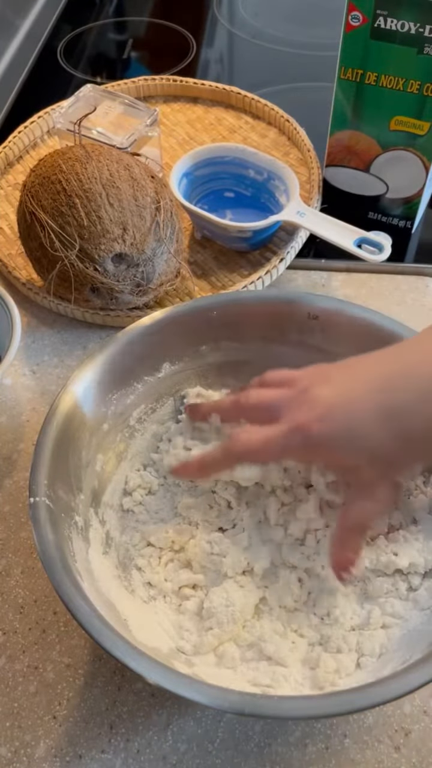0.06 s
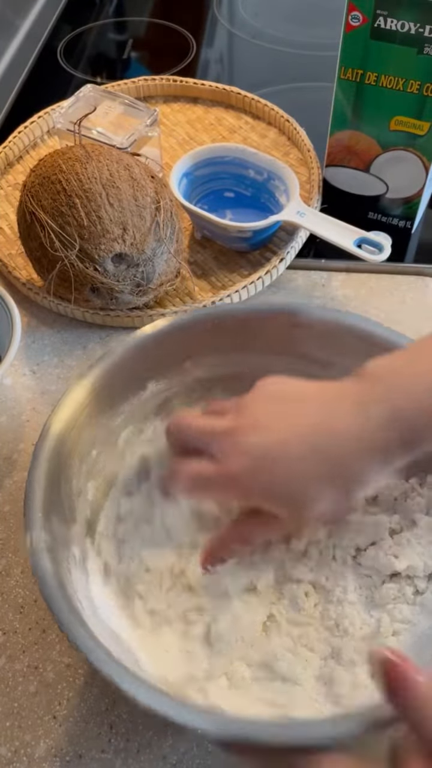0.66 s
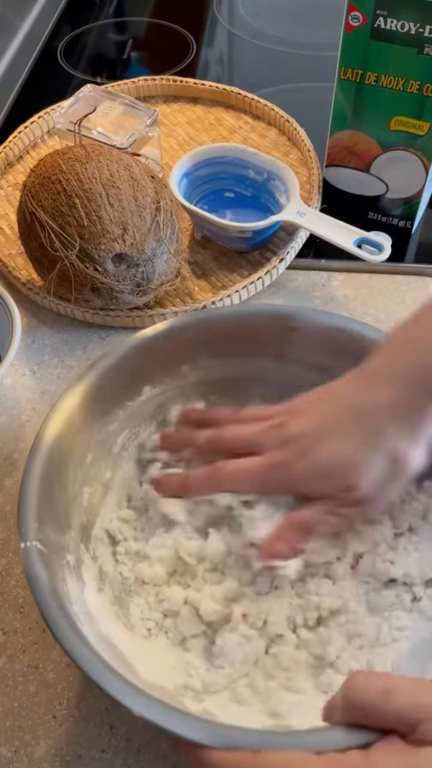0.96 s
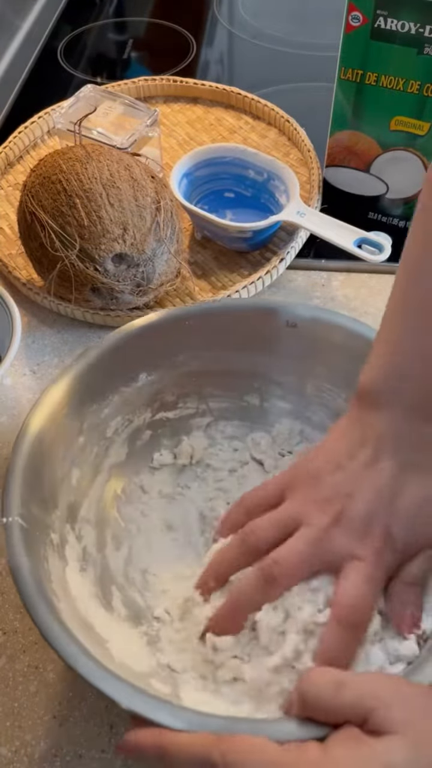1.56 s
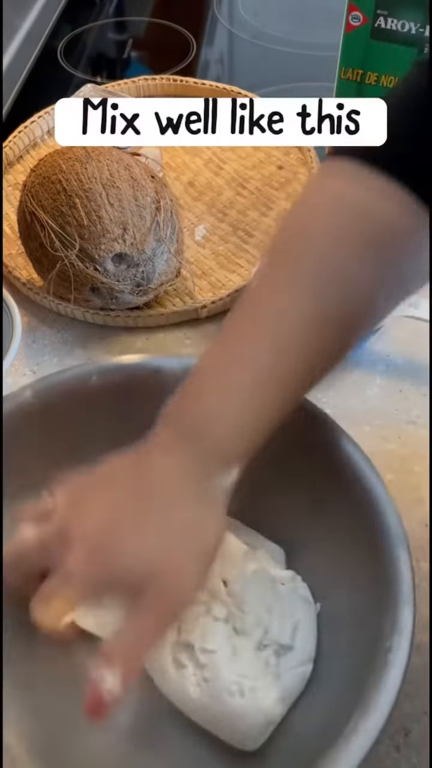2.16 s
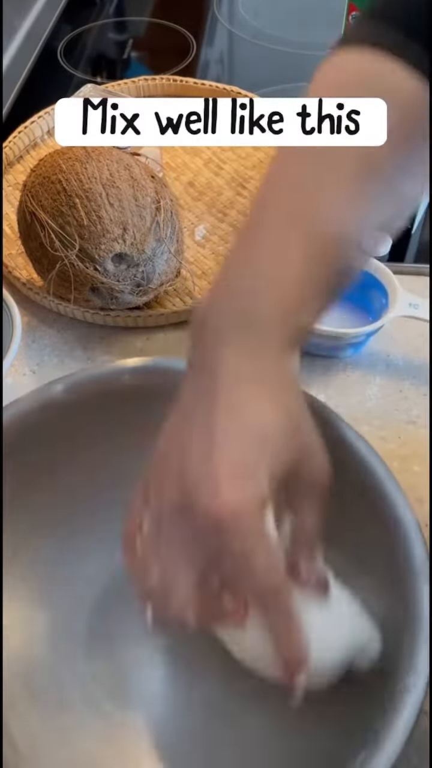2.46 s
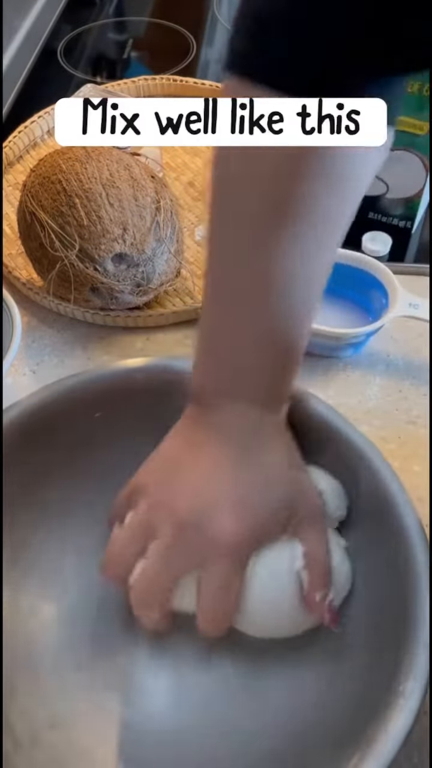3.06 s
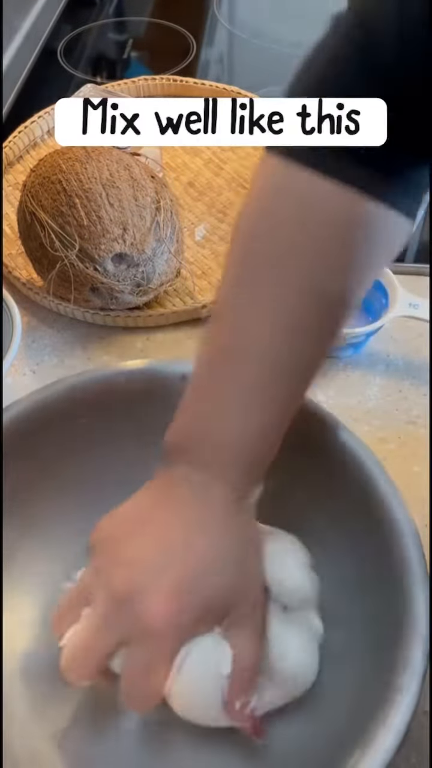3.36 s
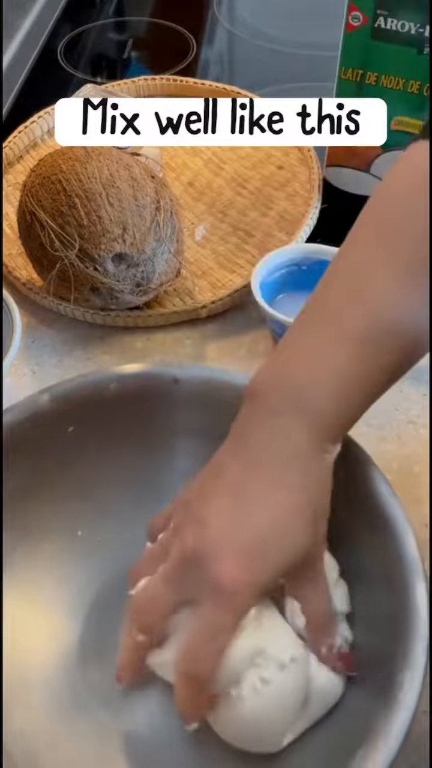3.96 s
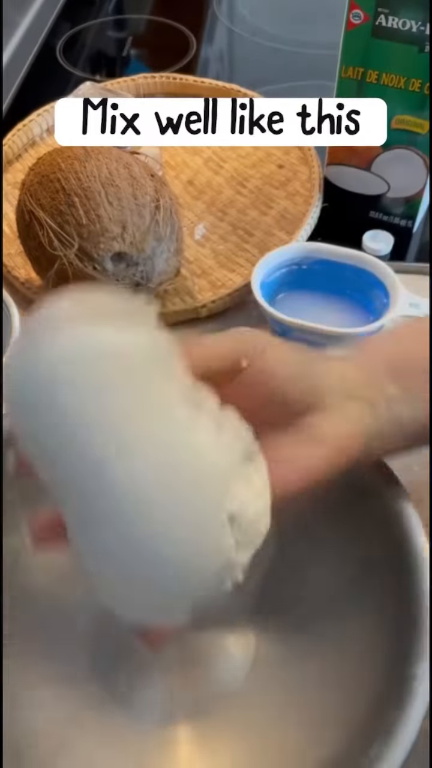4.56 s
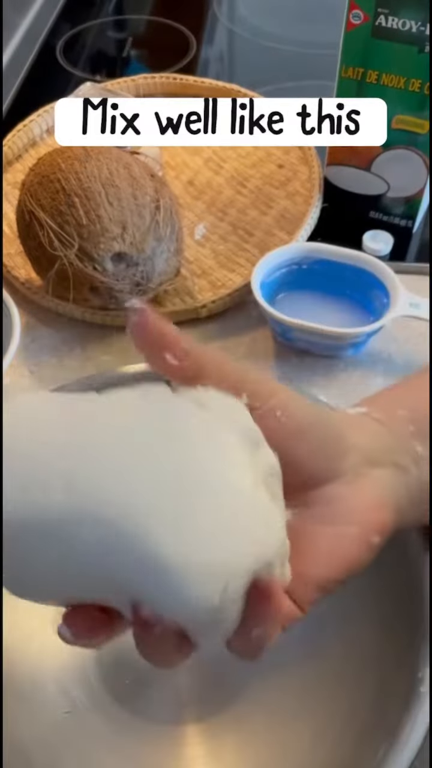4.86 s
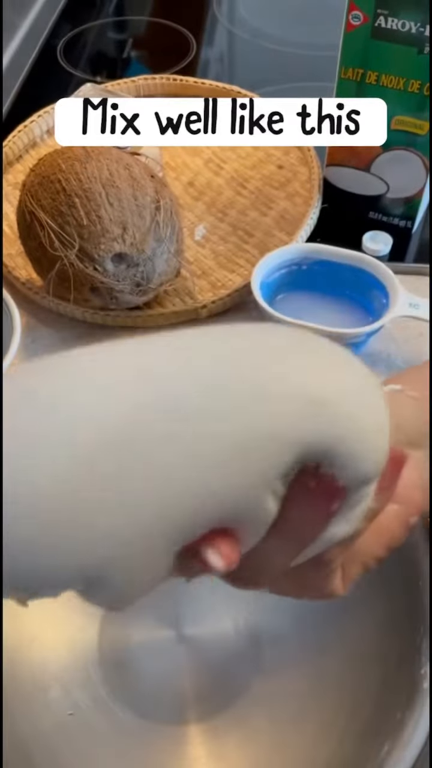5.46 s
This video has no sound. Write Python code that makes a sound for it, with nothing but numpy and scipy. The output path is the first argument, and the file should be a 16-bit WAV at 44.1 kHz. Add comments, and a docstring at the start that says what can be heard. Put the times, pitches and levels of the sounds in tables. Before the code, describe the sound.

A hand works flour and dough in a steel bowl, heard close up in a small kitchen with a faint echo and low room tone. For the first two seconds, uneven strokes rustle and scrape through crumbs, with soft pats that thud into the counter, the strongest at about 0.6 and 0.8 seconds. Fingers lightly brush the rim, and a sharper tap comes at 1.9 seconds. From there sticky dough drags and faintly squelches, with dull slaps over a low rumble from the bowl. Harder pushes knock the bowl on the counter: a thud with a short clank at 3.2 seconds, a lighter knock at 3.6, the loudest ringing clank just before 4, and more knocks from 4.1 to 4.6, with a strong one at 4.5. After that, faint skin and rim rubbing fades toward room tone by about 5.5 seconds.

```python
"""A steel bowl knocks on a kitchen counter as a hand mixes flour, then kneads sticky dough in it.
Each push rings the bowl's modes; the counter thuds just after. Pats slap and squeeze out trapped air.
Crumbs and skin rustle on the steel, dough drags and squelches, fingers brush the rim.
A small kitchen echoes faintly over its room tone. Heard close up, through a phone."""
import sys
import numpy as np
from scipy import signal
from scipy.fft import rfft, irfft
from scipy.io import wavfile
from scipy.ndimage import uniform_filter1d

SR = 44100
rng = np.random.default_rng(int(sys.argv[2]) if len(sys.argv) > 2 else 0)


def to_wav(sig):
    """Store sig (one row per channel, or 1-D mono) as 16-bit WAV at the path in sys.argv[1].

    Samples outside -1..1 are clipped; the rate is SR.
    """
    pcm = np.clip(np.atleast_2d(sig), -1, 1) * 32767
    pcm = np.round(pcm).astype(np.int16)
    wavfile.write(sys.argv[1], SR, pcm.T)  # frames by channels


N = 251370
TIME_S = np.arange(N) / SR
EVENT_S = TIME_S[:int(.9 * SR)]

# Spectra: f/Hz, level/dB
ROOM_SPECTRUM = [(12, -19), (20, -.5), (54, -5), (107, -5.5), (609, -32), (751, -35.5), (3270, -54),
                 (8200, -47), (10700, -64.5), (13900, -93), (22000, -120)]
ECHO_SPECTRUM = [(60, 0), (300, 9), (700, -2.5), (2000, -6), (6000, 0), (10000, -7)]
RUMBLE_SPECTRUM = [(20, -39), (32, -24.5), (45, -5.5), (64, 7.5), (90, -1), (118, 5.5), (150, -8.5),
                   (220, -14.5), (300, -11.5), (450, -21.5), (900, -54)]
RUSTLE_SPECTRUM = [(1500, -34.5), (2400, -16.5), (3500, -4.5), (4600, -8.5), (5400, -1), (6800, 1.5),
                   (8000, -8), (9200, 1), (10200, -29)]
DRAG_SPECTRUM = [(150, -1), (320, 0), (550, 4), (850, 0.5), (1120, 4.5), (1600, -2), (2200, -1.5),
                 (3300, -6), (4400, -3.5), (8000, -38.5)]
SLAP_SPECTRUM = [(120, -11), (335, 11), (520, -0.5), (750, 0), (1150, 2), (1700, -5.5), (2700, -3.5),
                 (3500, -5.5), (4400, -26.5), (8000, -39.5)]
CRACK_SPECTRUM = [(1800, -49.5), (2800, -13), (3600, -9), (4300, 6), (5200, 3), (6600, 7.5), (7600, 0.5),
                  (8600, -2), (10200, -23)]
# Counter under the bowl: f/Hz, t60/s, level/dB
COUNTER_MODES = [(71, 0.26, 3), (113, 0.25, 1.5), (180.4, 0.23, 1), (230, 0.13, -5.5), (289.9, 0.38, -14),
                 (362, 0.021, -14), (394, 0.11, -14.5), (470, 0.04, -20)]
# Steel bowl: f/Hz, t60/s, level/dB touched at bottom, at wall, at rim, left minus right/dB
BOWL_MODES = [(754, .075, 5, -12, -35, -5), (1075, .15, -15, -2, -14, -1), (1215, .07, -5, -10, -30, -1),
              (1281, .085, -3, -13, -35, -1), (1338, .07, -4, -11, -35, -1), (1470, .06, -1, -5, -35, 0),
              (1966, .1, -11, -12, -28, -2), (2600, .11, -19, -16, -16, 0), (1723, .45, -36, -25, -32, 0),
              (2096, .06, -13, -15, -18, -1), (2432, .5, -36, -21, -5, 0), (3660, .35, -38, -27, -1, 0),
              (910, .06, -19, -26, -35, -2), (1105, .45, -29, -24, -35, -1), (1610, .12, -25, -22, -35, 0),
              (1845, .15, -26, -23, -30, 0), (2229, .4, -30, -28, 3, 0), (2280, .12, -23, -21, -6, 0),
              (2790, .07, -24, -19, -16, 0), (2988, .25, -36, -25, -5, 0), (3133, .1, -29, -21, -14, 0),
              (3440, .2, -38, -28, -20, 0), (4253, .4, -52, -40, -2, 0), (5100, .1, -24, -24, -8, 0),
              (5335, .22, -28, -27, 1, 0), (5889, .25, -34, -30, -2, 0), (6358, .25, -34, -30, -5, 0)]
# Fingers on the rim: t/s, rise/s, 20 dB fall/s, level/dB, cutoff/Hz
RIM_BRUSHES = [(0.579, .07, 0.53, -55.5, 9500), (1.66, 0.25, 0.12, -53, 9200),
               (4.51, 0.093, 0.05, -52.5, 2000), (4.95, 0.14, .38, -64.5, 3527)]
# Hand round the bowl: t/s, rise/s, 20 dB fall/s, rustle/dB, drag/dB, scrape/Hz, crumbly share (0..1)
HAND_STROKES = [(0, .01, 0.16, -75, -62.5, 490, 0.44), (0.344, 0.012, 0.46, -54.5, -55, 926, 0.021),
                (0.402, 0.026, -0.05, -44.5, -67, 1070, 0.016), (0.459, .09, 0.58, -50, -56, 2050, 0.67),
                (0.79, 0.075, 0.32, -52.5, -56, 900, 0.14), (0.95, .08, 0.4, -49.5, -53.5, 1400, 0.56),
                (1.218, .045, 0.4, -90, -60.5, 730, 0.3), (1.29, .06, 0.67, -54, -59.5, 900, 0.7),
                (1.41, .08, 1.3, -59.5, -62, 2700, 0.14), (1.905, .015, 0.1436, -41.5, -44.5, 2090, 0.4),
                (2.03, .08, 0.43, -58.5, -56.5, 880, 0.57), (2.556, 0.044, 0.07, -43, -52.5, 1420, 0.066),
                (2.618, .02, 0.17, -54.5, -53, 1330, 0.22), (2.701, .15, 0.45, -46, -59, 2040, 0.24),
                (2.97, 0.244, -0.14, -53.5, -49.5, 1310, 0.56), (3.236, .01, 0.23, -65.5, -52, 1100, 0.93),
                (3.451, .1, 1.24, -62.5, -62, 1400, 0.6), (3.657, 0.025, 0.0655, -51, -46, 1600, .5),
                (3.85, .11, 0.17, -48.5, -49.5, 2000, 0.94), (4.02, .04, 0.48, -58, -42, 1492, 0.3),
                (4.14, .04, 0.36, -50.5, -56, 1300, .5), (4.382, .04, 0.134, -55, -47.5, 1200, 0.72),
                (4.529, .04, 0.0465, -48.5, -39, 1470, 0.96), (4.951, .11, 0.33, -62.5, -93.5, 2317, .3),
                (5.28, .17, 0.4, -77, -80, 2008, 0.58)]
# Soft pats: t/s, slap/dB, thud/dB, thud centre/Hz, place (0 bottom, 1 wall, 2 rim)
DOUGH_PATS = [(0.409, -56.5, -33.5, 96, 0), (0.533, -61, -39.5, 101, 1.2), (0.603, -38.5, -22.5, 114, 0.45),
              (0.622, -42.5, -46, 110, 0.54), (0.831, -41, -31.5, 116, 0),
              (1.367, -50.5, -51.5, 139, 0.081), (1.695, -54.5, -44, 92, 0.24),
              (1.883, -37.5, -36, 79, 1.9), (2.305, -44, -35.5, 101.6, 0.35),
              (2.598, -54.5, -43.5, 82, 0.39), (2.984, -54, -59, 170, 1.8), (3.1, -47, -66, 170, 0.28),
              (3.194, -46, -42.5, 85, 0.66), (3.513, -58.5, -48.5, 99, 0.89), (3.813, -48.5, -38, 100, .1)]
# Hard knocks: t/s, clank/dB, crack/dB, thud/dB, thud centre/Hz, place, ring time factor
STEEL_KNOCKS = [(0.718, -51.5, -38.5, -50, 99, 1.23, 0.23), (1.885, -57, -28, -44, 260, 1.67, 1),
                (3.222, -28.5, -36.5, -24, 120, 0.53, 0.17), (3.238, -35.5, -50, -56, 180, 0.53, 0.14),
                (3.640, -35.5, -38, -45.5, 108, 0.46, .12), (3.702, -53, -46, -61.5, 120.4, 1, .25),
                (3.951, -12, -26.5, -21.5, 199, 0.13, 0.89), (4.019, -36, -73, -39, 200, 0.83, 0.21),
                (4.081, -37, -46.5, -30.5, 169, 0.61, 0.9), (4.371, -36.5, -50, -25, 46, 0.95, 0.73),
                (4.487, -22, -33.5, -20, 115, 0.87, 0.82), (4.564, -34.5, -44.5, -29.5, 173, 0.63, 0.35)]


def undb(db):
    return 10 ** (np.asarray(db) / 20)


def unit(x):
    return x / np.sqrt(np.mean(x ** 2))


def burst(x):
    """Rms 1 over the first 30 ms."""
    return x / np.sqrt(np.mean(x[..., :int(.03 * SR)] ** 2))


def noise(size):
    return rng.standard_normal((2, size))


def wobble(rate_hz):
    """Smooth random drift, rms 1."""
    hold = int(SR / rate_hz)
    steps = np.repeat(rng.standard_normal(N // hold + 1), hold)
    return unit(uniform_filter1d(steps, hold)[:N])


def grains(per_s, scatter_db):
    """Tiny clicks, a few much larger than the rest."""
    clicks = noise(N) * (rng.random(N) < per_s / SR)
    return clicks * undb(scatter_db * np.minimum(rng.exponential(size=N), 4))


def colour(x, spectrum):
    """Filter by a spectrum table; rms 1."""
    hz, db = np.transpose(spectrum)
    f = np.maximum(np.fft.rfftfreq(x.shape[-1], 1 / SR), 1)
    gain = undb(np.interp(np.log(f), np.log(hz), db))
    return unit(irfft(rfft(x) * gain, x.shape[-1]))


def band(x, hz, octaves):
    """Steep band-pass; rms 1."""
    f = np.maximum(np.fft.rfftfreq(x.shape[-1], 1 / SR), 1)
    return unit(irfft(rfft(x) / (1 + (np.log2(f / hz) / octaves) ** 4), x.shape[-1]))


def butter(x, hz, kind):
    return signal.sosfilt(signal.butter(2, min(hz, SR / 3), kind, fs=SR, output="sos"), x)


def spread(pair, side_db, pan_db=0):
    """Mid, side -> left, right."""
    mid, side = pair[0], pair[1] * undb(side_db)
    return np.array([(mid + side) * undb(pan_db / 2), (mid - side) * undb(-pan_db / 2)])


def add(out, sound, at_s):
    start = int(at_s * SR)
    part = sound[:, :N - start]
    out[:, start:start + part.shape[1]] += part


def fade(t60_s, rise_s):
    """Blow envelope: quick rise, exponential decay."""
    return (1 - np.exp(-EVENT_S / rise_s)) * undb(-60 * EVENT_S / max(t60_s, .005))


def gesture(t, rise_s, fall_s):
    """Hand speed: builds smoothly, then comes to rest."""
    build = np.sin(np.pi / 2 * np.clip(t / rise_s, 0, 1))
    return build * undb(-20 * np.maximum(t - rise_s, 0) / max(fall_s, .01))


def room_tone(level_db=-63.5):
    """Still kitchen air, mostly bass."""
    return undb(level_db) * spread(colour(noise(N), ROOM_SPECTRUM), side_db=-14.5)


def kitchen_echo(x, t60_s=.36, wet_db=-19):
    """Diffuse echo off cupboards and tiles."""
    tail = colour(noise(len(EVENT_S)), ECHO_SPECTRUM) * fade(t60_s, rise_s=.011)
    tail[1] = butter(tail[1], 500, "high")  # long waves reach both microphones alike
    tail = spread(tail, side_db=-5) / np.linalg.norm(tail[0])
    return undb(wet_db) * signal.fftconvolve(x, tail, axes=1)[:, :N]


def hollow(x, t60_s=.05, echo_db=-2):
    """Bounces inside the bowl leave narrow peaks and dips."""
    bounces = rng.standard_normal(len(EVENT_S)) * fade(t60_s, rise_s=.003)
    echo = signal.fftconvolve(x, bounces[None] / np.linalg.norm(bounces), axes=1)
    return unit(x + undb(echo_db) * echo[:, :x.shape[1]])


def wall_notch(x, hz=4330, width_hz=420):
    """An echo off the bowl's wall cancels one band."""
    b, a = signal.iirnotch(hz, hz / width_hz, fs=SR)
    return signal.lfilter(b, a, signal.lfilter(b, a, x))


def rim_brush(damping=1.15):
    """Sliding fingers excite and damp the rim's high modes."""
    f = np.fft.rfftfreq(N, 1 / SR)
    response = sum(undb(rim_db) / (1 + 2j * np.pi * (f - hz) * t60_s / damping / np.log(1000))
                   for hz, t60_s, _, _, rim_db, _ in BOWL_MODES)
    shimmer = spread(unit(irfft(rfft(noise(N)) * response, N)), side_db=-4)
    return sum(undb(db) * unit(butter(shimmer, cutoff_hz, "low")) * gesture(TIME_S - at_s, rise_s, fall_s)
               for at_s, rise_s, fall_s, db, cutoff_hz in RIM_BRUSHES)


def squelch(pockets_hz=(657, 1120, 1610, 2550)):
    """Air pockets pop in the dough."""
    pops = sum(band(grains(per_s=140, scatter_db=6.5), hz, octaves=.27) for hz in pockets_hz)
    return spread(hollow(pops), side_db=-16)


def bowl_rumble(drag_level, rest_db=-57.5, over_drag_db=2.5, lifted_s=4.78, fall_s=.5):
    """Rumble under the hand; follows the drag, dies once the dough is lifted."""
    resting = undb(rest_db - 20 * np.maximum(TIME_S - lifted_s, 0) / fall_s)
    rumble = spread(colour(noise(N), RUMBLE_SPECTRUM), side_db=-33.5)
    return rumble * np.hypot(resting, undb(over_drag_db) * drag_level)


def rubbing(drag_gain_db=1.5, squelch_gain_db=-12.5):
    """Crumbly share of the strokes: crumbs rustle, sticky dough drags in small slips."""
    rustle_level = drag_level = 0
    for at_s, rise_s, fall_s, rustle_db, drag_db, _, crumbly in HAND_STROKES:
        effort = np.sqrt(crumbly) * gesture(TIME_S - at_s, rise_s, fall_s)
        rustle_level = np.hypot(rustle_level, undb(rustle_db) * effort)
        drag_level = np.hypot(drag_level, undb(drag_db) * effort)
    slips = wobble(rate_hz=49)
    rustle = spread(colour(hollow(grains(per_s=3000, scatter_db=.5)), RUSTLE_SPECTRUM), side_db=-5.5)
    drag = spread(colour(hollow(grains(per_s=3000, scatter_db=2.5)), DRAG_SPECTRUM), side_db=-7.5)
    crumbs = rustle * undb(2 * slips)
    dough = wall_notch(drag) * undb(drag_gain_db + 1.3 * slips) + undb(squelch_gain_db) * squelch()
    return rustle_level * crumbs + drag_level * dough + bowl_rumble(drag_level)


def swipes(hiss_hz=7280, hiss_gain_db=-2.5, scrape_gain_db=-2):
    """Smooth share of the strokes: skin hisses, dough scrapes; the hand alters the echo each time."""
    out = np.zeros((2, N))
    for at_s, rise_s, fall_s, rustle_db, drag_db, scrape_hz, crumbly in HAND_STROKES:
        friction = hollow(noise(len(EVENT_S)), t60_s=.079, echo_db=-1.5)
        hiss = spread(band(friction, hiss_hz, octaves=.3), side_db=-4.5)
        scrape = spread(band(friction, scrape_hz, octaves=.55), side_db=-20.5)
        slide = undb(rustle_db + hiss_gain_db) * hiss + undb(drag_db + scrape_gain_db) * scrape
        add(out, slide * np.sqrt(1 - crumbly) * gesture(EVENT_S, rise_s, fall_s), at_s)
    return out


def counter_thud(centre_hz, at_s, dough_from_s=1.8, octaves=1.07):
    """Slow counter modes round centre_hz; heavy dough damps them more than loose flour."""
    ring = .92 if at_s < dough_from_s else .36
    out = 0
    for k, (hz, t60_s, db) in enumerate(COUNTER_MODES):
        weight = (-1) ** k * undb(db) / (1 + (np.log2(hz / centre_hz) / octaves) ** 4)
        out += weight * np.sin(2 * np.pi * hz * EVENT_S) * fade(t60_s * ring, rise_s=.005)
    return burst(out) * np.ones((2, 1))


def air_pock():
    """Air escapes between dough and steel: a short hollow note."""
    air = spread(band(noise(len(EVENT_S)), hz=790, octaves=.66), side_db=-12)
    return burst(air * fade(t60_s=.034, rise_s=.001))


def bowl_clank(place, ring, bend_depth=.002, bend_hz=12, build_cycles=5, contact_s=.00058):
    """Place weights the steel's modes; dough cushions the onset, shortens the ring, bends the pitch."""
    out = np.zeros((2, len(EVENT_S)))
    for hz, t60_s, bottom_db, wall_db, rim_db, pan_db in BOWL_MODES:
        t = EVENT_S[:int(1.3 * t60_s * max(ring, .2) * SR)]
        phase, bend_phase = rng.uniform(0, 2 * np.pi, 2)
        bend = bend_depth * hz / bend_hz * np.sin(2 * np.pi * bend_hz * t + bend_phase)
        # short waves reach the two microphones further out of step
        skew = .3 * np.sqrt(hz / 3000) * rng.standard_normal((2, 1))
        place_db = np.interp(place, [0, 1, 2], [bottom_db, wall_db, rim_db])
        gain = undb(place_db + np.array([[pan_db], [-pan_db]]) / 2)
        envelope = (1 - np.exp(-t * hz / build_cycles)) * undb(-60 * t / (t60_s * ring))
        out[:, :len(t)] += gain * envelope * np.sin(2 * np.pi * hz * t + phase + bend + skew)
    return burst(out * (1 - np.exp(-EVENT_S / contact_s)))


def blow(slap_db, crack_db, clank_db, place, ring):
    """One contact: dull dough slap, bright crack, nail snap, ringing steel."""
    size = len(EVENT_S) // 3
    slap = spread(colour(noise(size), SLAP_SPECTRUM), side_db=-14.5, pan_db=-1.5)
    slap *= fade(t60_s=.073, rise_s=.0026)[:size]
    slap = butter(slap, 1200 * 2 ** (2.4 * place), "low")  # duller on the cushioned bottom
    crack = spread(colour(hollow(noise(size)), CRACK_SPECTRUM), side_db=-3)
    crack *= fade(t60_s=.019 + .09 * ring, rise_s=.002)[:size]
    snap = spread(band(noise(size), hz=8496, octaves=.12), side_db=-15)
    snap *= fade(t60_s=.015, rise_s=.0028)[:size]
    snap_db = crack_db - 12 + 12.5 * (place - 1)  # louder towards the bare rim
    out = undb(clank_db) * bowl_clank(place, ring)
    for db, part in (slap_db, slap), (crack_db, crack), (snap_db, snap):
        out[:, :size] += undb(db) * burst(part)
    return out


def knocks_and_pats(thud_lag_s=.004):
    """Knocks are mostly steel, pats mostly dough and air; the counter answers each."""
    out = np.zeros((2, N))
    for at_s, clank_db, crack_db, thud_db, thud_hz, place, ring in STEEL_KNOCKS:
        add(out, blow(clank_db - 9.5, crack_db, clank_db, place, ring), at_s)
        add(out, undb(thud_db) * counter_thud(thud_hz, at_s), at_s + thud_lag_s)
    for at_s, slap_db, thud_db, thud_hz, place in DOUGH_PATS:
        add(out, blow(slap_db, slap_db - 15, slap_db - 17, place, ring=.45), at_s)
        add(out, undb(slap_db - 5) * air_pock(), at_s)
        add(out, undb(thud_db) * counter_thud(thud_hz, at_s), at_s + thud_lag_s)
    return out


def scene():
    """Bowl, echo, room tone."""
    bowl = wall_notch(knocks_and_pats() + swipes()) + rubbing() + rim_brush()
    return bowl + kitchen_echo(bowl) + room_tone()


def record(dry, low_hz=40, top_hz=10400, ceiling=.92):
    """Phone: bass cut, soft clip, steep treble cut."""
    thin = butter(dry, low_hz, "high")
    rounded = thin / (1 + (thin / ceiling) ** 8) ** (1 / 8)
    return signal.sosfilt(signal.ellip(10, .2, 95, top_hz, fs=SR, output="sos"), rounded)


dry = scene()
out = record(dry)
to_wav(out)
```